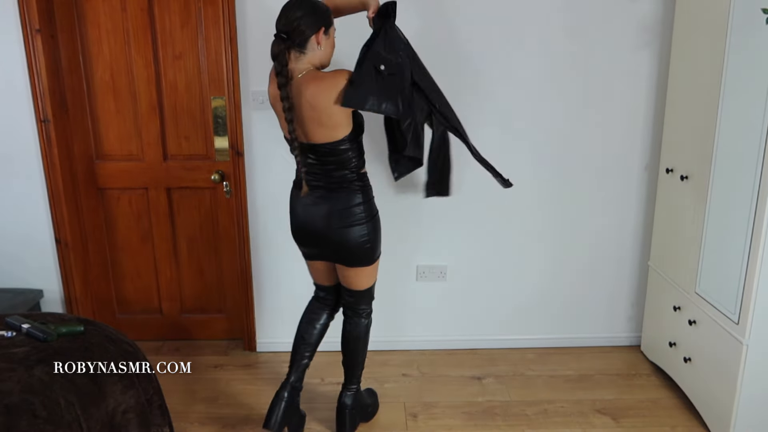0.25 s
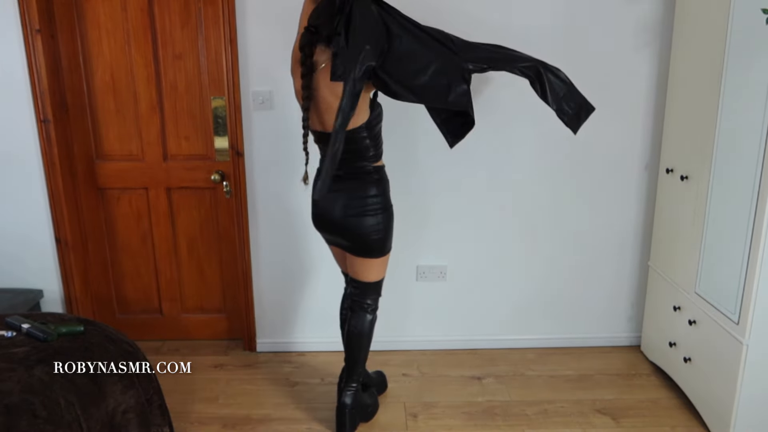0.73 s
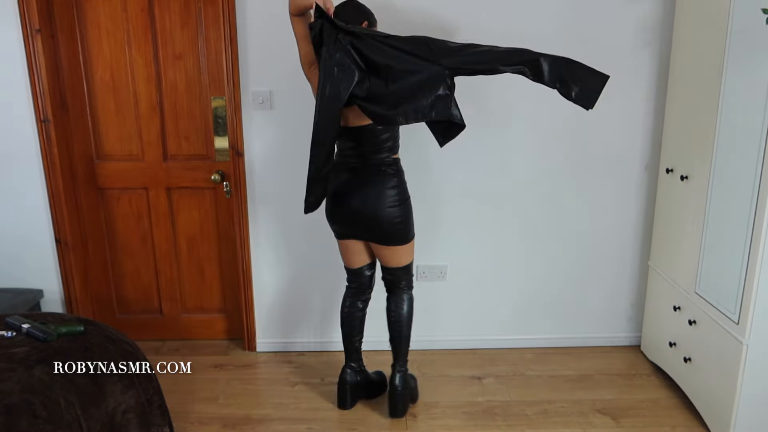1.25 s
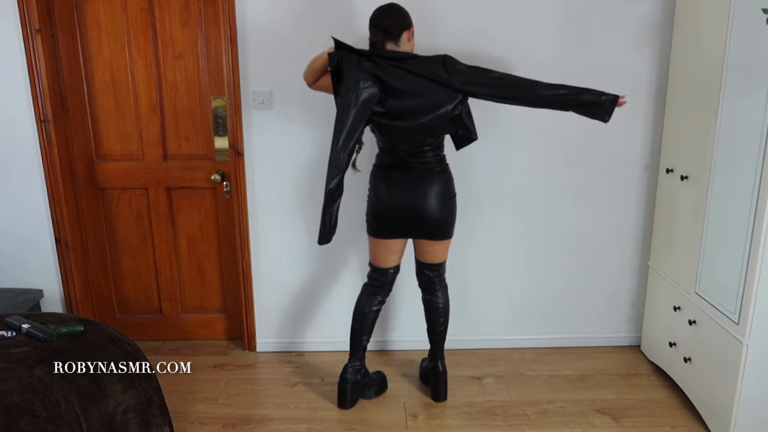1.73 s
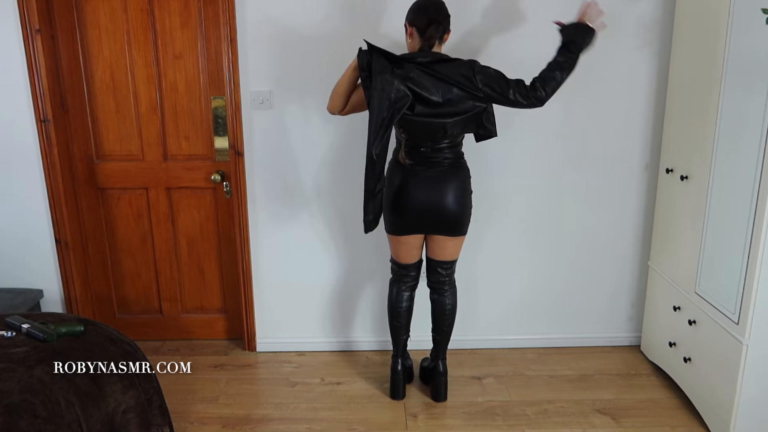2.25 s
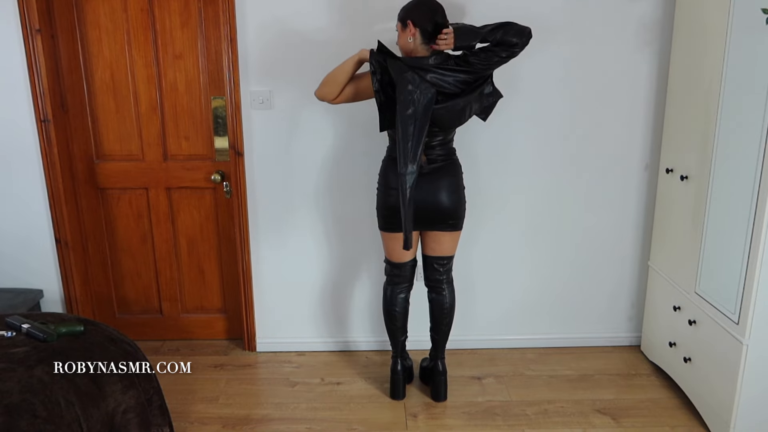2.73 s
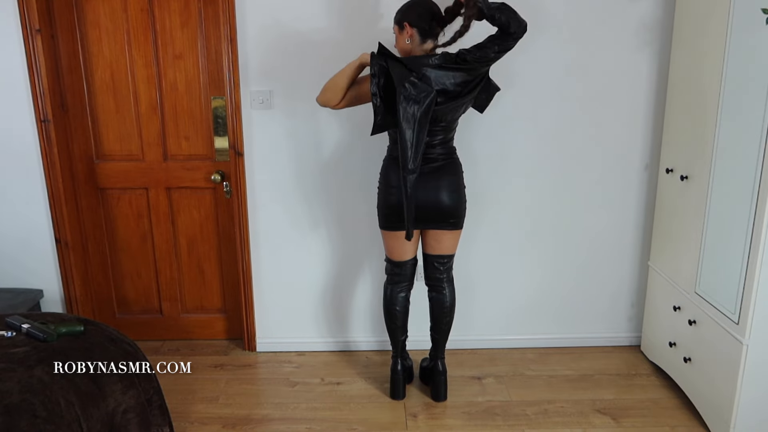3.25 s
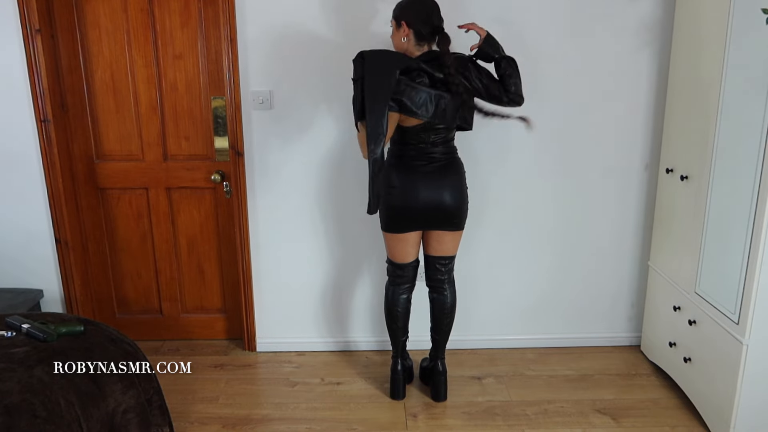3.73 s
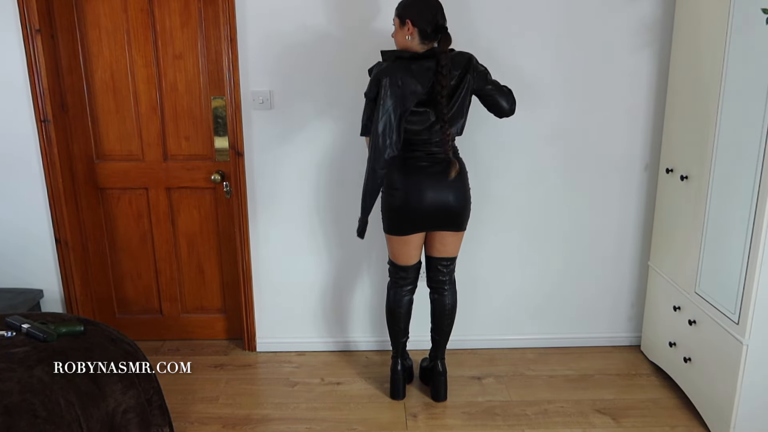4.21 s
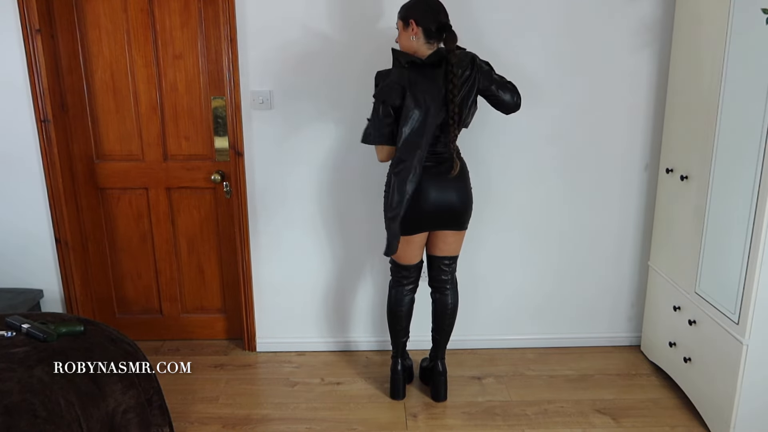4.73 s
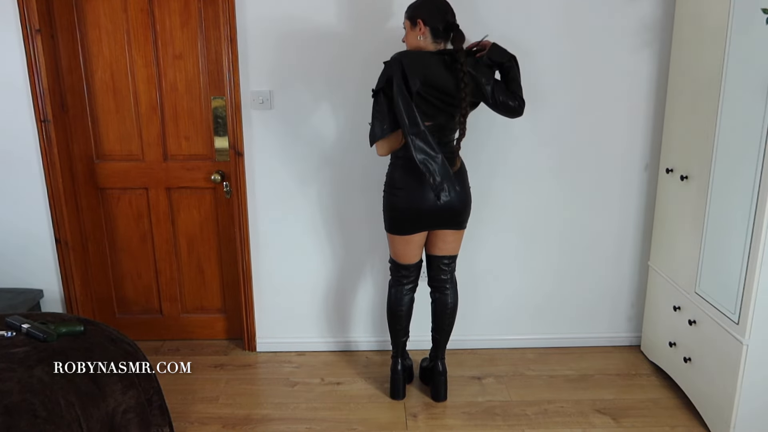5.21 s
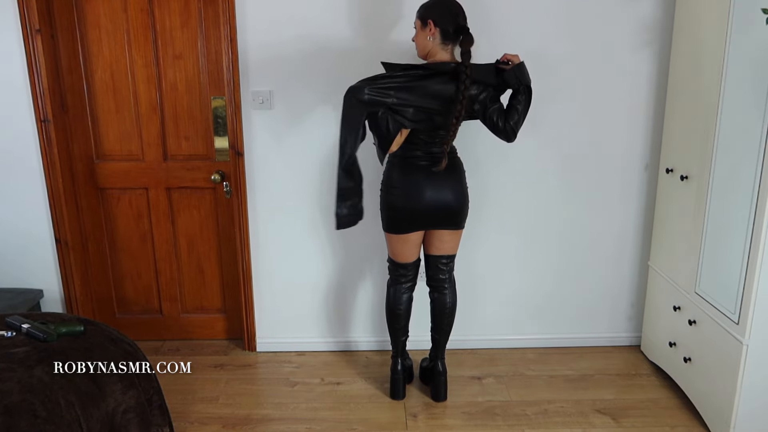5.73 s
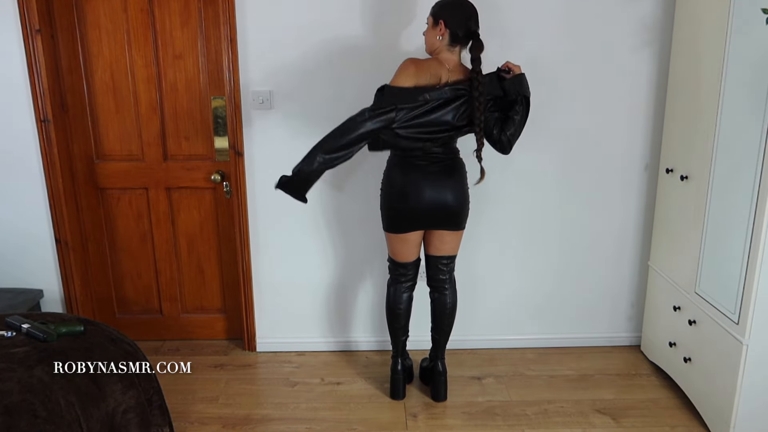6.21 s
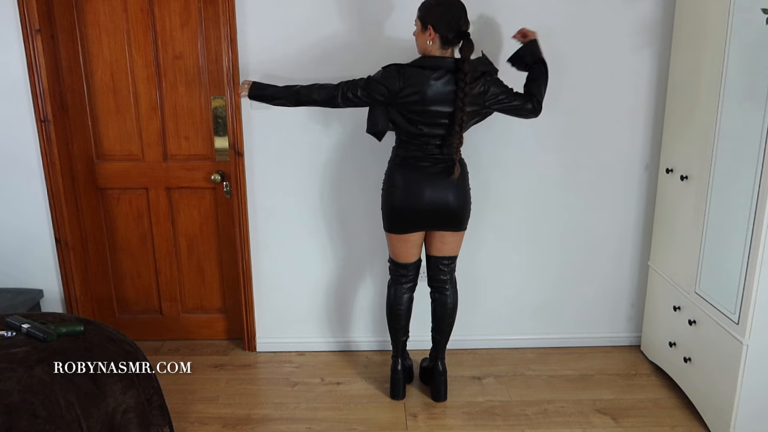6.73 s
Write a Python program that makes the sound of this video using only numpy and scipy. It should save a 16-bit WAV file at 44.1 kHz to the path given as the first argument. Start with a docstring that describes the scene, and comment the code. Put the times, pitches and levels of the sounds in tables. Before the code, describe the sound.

A leather jacket is put on in a small, briefly echoing bedroom, heard from a few metres away over a quiet low rumble. At once a heavy boot knocks on wooden boards with a deep boom, beside a soft leather swish. A second strong step falls at 0.65 s with a small click. From 1.0 to 1.6 s the loose jacket slaps and flutters in a crisp flurry, sharpest around 1.2 s; a softer double step comes at 1.5 s, a click at 1.7 s, and a last heel-and-sole thud near 2.2 s. It is then quieter, with faint rustling and a dull click at 2.6 s. From 3 s rubbing grows; a sharp fold pops at 3.7 s, and creaky crumpling and snaps continue to 5.7 s. Bright lining hisses surge loudest at about 5.8 s and again at 6.1 and 6.5 s, with final fold snaps before 6.8 s as the rustle fades.

```python
"""A leather jacket is swung round and pulled on in a small bedroom, a few metres from one microphone.
Friction is modelled as grains of noise: the lining hisses over arms and shoulders, the hide rubs and crumples.
Impacts and buckling are short noise bursts: loose leather slaps, single folds snap or flop over, hard parts click.
Heavy platform boots take four steps on a wooden floor: damped modes of the boards, and a low boom under each.
Dense decaying echoes form the room, over a quiet low rumble."""
import sys
import numpy as np
from scipy import signal
from scipy.fft import rfft, irfft
from scipy.io import wavfile
from scipy.ndimage import uniform_filter1d

SR = 44100
rng = np.random.default_rng(int(sys.argv[2]) if len(sys.argv) > 2 else 0)


def persist_wave(psi):
    """Save psi, clipped to +-1, as 16-bit WAV."""
    counts = np.round(np.clip(psi, -1, 1) * 32767).astype(np.int16)
    wavfile.write(sys.argv[1], SR, np.atleast_2d(counts).T)


N = 306847
TIME = np.arange(N) / SR  # s

# Levels are relative: later gains balance the sources against one another.
# Spectra of sliding lining, rubbing hide, taut crumpling and deeper crumpling of loose panels: f/Hz, level/dB
LINING_SPECTRUM = [(1200, -7), (2500, -2), (4000, 0.5), (7000, 0), (9500, -3), (12500, -10.5), (16000, -25)]
HIDE_SPECTRUM = [(400, -18.5), (800, -3.5), (1250, 2.5), (2200, 1), (3200, -4), (5000, -17.5),
                 (9000, -17.5)]
TAUT_SPECTRUM = [(100, -31.5), (300, -14.5), (550, -5.5), (820, -1), (1200, -6.5), (2000, -9.5),
                 (4000, -57)]
LOOSE_SPECTRUM = [(70, -28.5), (150, -5), (240, -3), (420, 0), (600, -1.5), (1000, -23), (3000, -44)]
# Swishes over arms and shoulders: t/s of greatest speed, lining level/dB, hide above lining/dB, rise/s, fall/s
SWISHES = [(.02, -31.5, -2, 0.16, 0.24), (.42, -37, 2, 0.18, 0.23), (1.075, -30, 1, 0.15, 0.1),
           (1.53, -38, 4, 0.55, .17), (1.82, -41, 1, 0.1, .09), (2.0, -39.5, 3, .06, 0.069),
           (2.2, -39, 3, 0.097, 0.089), (2.5, -40.5, 4, 0.24, .16), (3.02, -35.5, 3, 0.18, 0.17),
           (3.18, -33.5, 2, 0.12, 0.095), (3.71, -32, 4.5, 0.29, 0.21), (3.87, -37, 10, .1, 0.037),
           (4.32, -35.5, 0, 0.41, 0.2), (4.495, -31, 4, 0.047, 0.05), (4.66, -31.5, 0, 0.087, 0.25),
           (5.12, -30.5, 2, 0.12, 0.26), (5.43, -31, 4, 0.12, 0.074), (5.68, -27.5, 4, 0.19, 0.11),
           (5.838, -22.5, 0.5, 0.13, 0.098), (5.99, -28, -1, 0.066, 0.055), (6.14, -24.5, 1, 0.16, .15),
           (6.48, -27.5, 1.5, 0.19, .38), (6.88, -34.5, 2, 0.28, 0.36)]
# How much the hide is bunched up, most while an arm works into its sleeve: t/s, level/dB
BUNCHING = [(0, -33.5), (.25, -40.5), (.88, -41.5), (1.02, -29), (1.3, -50), (1.83, -34), (1.95, -41.5),
            (3.35, -40), (3.5, -30), (3.8, -29), (4.15, -29.5), (4.45, -32.5), (4.9, -31.5), (5.15, -27),
            (5.5, -32.5), (5.85, -30.5), (6.15, -37), (6.3, -32), (6.96, -41.5)]
# How loose the jacket hangs: t/s, level/dB
SLACK = [(0, -4), (1.1, 1), (3.85, -6.5), (4.2, -3.5), (6.96, -2)]
# Gain of the lining slips' highest treble: t/s, level/dB
TREBLE_GAIN = [(0, -2), (.4, -1), (1.15, -2.5), (1.85, 0), (3.55, 1.5), (3.85, -1.5), (4.75, .5),
               (5.45, 2.5), (6.1, 2), (6.35, -1.5), (6.96, -4)]
# Loose leather slapping against itself: t/s, level/dB, brightness f/Hz, T60/s, dull body level/dB
SLAPS = [(.036, -26, 1500, .26, -10.5), (0.717, -31.5, 5800, 0.18, -1), (0.991, -24, 3180, 0.38, -7.5),
         (1.059, -20.5, 3200, .1, -2.5), (1.082, -21.5, 3500, .08, -4), (1.104, -23.5, 3000, 0.061, 8.5),
         (1.207, -16, 3470, 0.15, .5), (1.233, -21, 3040, 0.16, -3.5), (1.262, -22.5, 3330, 0.29, -4),
         (1.315, -23, 3520, 0.088, -1), (1.4129, -20, 4440, 0.078, 0), (1.494, -25, 3890, 0.08, -3.5),
         (1.583, -26.5, 4530, 0.15, -17), (3.868, -25.5, 3400, 0.062, -2)]
# Spectrum of the dull body of a slap: f/Hz, level/dB
SLAP_BODY_SPECTRUM = [(80, -37), (220, 4), (450, 8.5), (750, 7.5), (1200, -0.5), (2500, -45), (6000, -33)]
# Spectrum of ticking creases: f/Hz, level/dB
CREASE_SPECTRUM = [(200, -16), (600, -4), (1400, -9), (3200, 5.5), (6000, -4.5), (15000, -13)]
# The loudest folds buckling over: t/s, level/dB, centre f/Hz, length/s
FOLDS = [(3.469, -27, 700, 0.029), (3.602, -25, 830, 0.014), (3.7132, -12, 825, 0.01),
         (3.726, -24, 700, 0.015), (3.9835, -19, 756, 0.0077), (4.096, -24.5, 890, 0.021),
         (4.144, -19, 620, 0.032), (4.316, -28, 600, 0.022), (4.474, -25.5, 650, 0.029),
         (4.634, -24, 790, 0.022), (4.905, -16.5, 610, 0.014), (4.943, -32, 554, 0.021),
         (5.116, -17.5, 586, 0.007), (5.147, -17.5, 830, 0.015), (5.166, -19, 930, 0.027),
         (5.378, -17.5, 680, 0.015), (5.659, -23, 680, 0.032), (5.832, -20.5, 580, 0.039),
         (6.647, -19.5, 1370, 0.015), (6.759, -25.5, 1000, .012)]
# Hard clicks, likely the zip pull or studs: t/s, level/dB, brightest f/Hz
CLICKS = [(0.648, -27.5, 2930), (1.695, -24, 2500), (2.608, -20.5, 1490)]
# Modes of the small hard part: f/Hz, level/dB, T60/s
STUD_MODES = [(890, 14, 0.085), (1340, -1, 0.212), (1373, 10.5, 0.15), (2379, 5, 0.2), (2895, 6, 0.15)]
# A heel or sole meeting the boards: t/s, knock level/dB, boom level/dB, boom f/Hz, lingering hum level/dB
FOOTFALLS = [(.038, -20.5, -8.5, 93.6, -48), (0.6451, -19, -8, 112.8, -28), (1.535, -25.5, -11, 102, -47),
             (1.615, -26, -15.5, 94.5, -53), (2.169, -20.5, -16, 99.4, -44), (2.222, -17, -14, 89, -53)]
# Modes of the floor boards: f/Hz, level/dB, T60/s
BOARD_MODES = [(142.7, 14.5, 0.21), (212.6, 0, 0.21), (263.6, 6.5, 0.21), (328.8, 2.5, 0.41),
               (419, -7, 0.63), (466, 0, 0.38), (548, 1, 0.082), (765, -13, 0.1)]
# Spectrum of the sole's contact noise: f/Hz, level/dB
SOLE_SPECTRUM = [(100, -11.5), (300, 9.5), (600, -1.5), (1000, -8.5), (2000, -18), (4000, -24), (9000, -50)]
# Modes of the joists: f/Hz, level/dB, T60/s
JOIST_MODES = [(90, -4, 0.25), (102, -4.5, 0.99), (118.8, -3, 0.93)]
# Lowest modes of the room: f/Hz, level/dB, T60/s
ROOM_MODES = [(86.6, 1, 2.1), (98.3, -7.5, 6)]
# Spectrum of the background air: f/Hz, level/dB
AIR_SPECTRUM = [(20, -16), (35, -5), (60, 2), (92, 0.5), (130, 0), (250, -3), (600, -11), (2000, -14.5),
                (8000, -34), (16000, -30)]
# Low rumble of the room and of air pushed about by the jacket: t/s, level/dB
RUMBLE = [(0, -41), (2.6, -46), (3.6, -44), (4.3, -45), (5.05, -36.5), (5.5, -48), (6.96, -55)]

SWELL_EDGE_DB = -9.5  # gain one rise before or one fall after the peak of any swell
SWISH_SHAPE = 1.47  # 1 = pointed, 2 = round
REST_LINING_DB, REST_HIDE_DB = -46, -47.5  # the jacket never hangs quite still
CRUMPLE_FOLLOWS, USUAL_HIDE_DB = 0.28, -33.5  # dB of crumpling per dB of rubbing above the usual
CREASE_DB, CREASE_T60_S = -12, 0.67  # ticking against the level of the slap that sets it off
BOOM_LAG_S, BOOM_RISE_S, BOOM_FALL_S = 0.0605, 0.031, 0.017  # the weight arrives after the knock
BOOM_SHAPE, BOOM_ONSET_S = 0.72, 0.012  # pointed swell with a soft start
# the boom sinks through its tabled pitch at the lag, by this share of it in all, with this time constant
BOOM_BEND, BOOM_SETTLE_S = 0.42, 0.055
TOP_HZ = 15900


def rustle():
    """Stick-slip friction: fine lining slips, coarser hide and sparse crumpling catch and let go together."""
    slide_db, rub_db, crumple_db = motion()
    catch = walk(rate=70)
    slips = grains(N, rate=10000, spread_db=1.0)
    # the treble above 9 kHz is raised and lowered over time
    treble_filter = signal.butter(2, 9000, "high", fs=SR, output="sos")
    treble = signal.sosfiltfilt(treble_filter, slips)
    slips = slips + treble * (undb(curve(TREBLE_GAIN)) - 1)
    lining = colour(slips, LINING_SPECTRUM) * undb(slide_db + 0.9 * catch + 1.8)

    rubs = grains(N, rate=2200, spread_db=1.0)
    hide = colour(rubs, HIDE_SPECTRUM) * undb(rub_db + 0.76 * catch + 0.5)

    taut = colour(grains(N, rate=900, spread_db=2.5), TAUT_SPECTRUM)
    loose = colour(grains(N, rate=900, spread_db=0.5), LOOSE_SPECTRUM) * undb(curve(SLACK))
    crumpling = (taut + loose) * undb(crumple_db + 1.4 * catch - 3)
    return lining + hide + crumpling


def motion():
    """Superposition of powers: swishes add to a faint stir, and bunched hide crumples more as it rubs (dB)."""
    slide_power, rub_power = undb(REST_LINING_DB) ** 2, undb(REST_HIDE_DB) ** 2
    for s, db, hide_above_db, rise, fall in SWISHES:
        speed = undb(db) * swell(TIME - s, rise, fall, SWISH_SHAPE)
        slide_power = slide_power + speed ** 2
        rub_power = rub_power + (speed * undb(hide_above_db)) ** 2
    slide_db, rub_db = 10 * np.log10(slide_power), 10 * np.log10(rub_power)
    crumple_db = curve(BUNCHING) + CRUMPLE_FOLLOWS * (rub_db - USUAL_HIDE_DB)
    return slide_db, rub_db, crumple_db


def flutter():
    """Elastic recovery: lone creases tick as the hide bends back after each slap."""
    ticks = grains(N, rate=130, spread_db=2)
    bending_power, t = np.zeros(N), np.arange(SR) / SR
    for s, db, *_ in SLAPS:
        add(bending_power, s, (undb(db + CREASE_DB) * fade(t, CREASE_T60_S)) ** 2)
    return colour(ticks, CREASE_SPECTRUM) * np.sqrt(bending_power)


def slaps():
    """Impact of flat sheets: a sharp smack, a patter as the flap settles, and dull air pressed out beneath."""
    out, t = np.zeros(N), np.arange(SR // 3) / SR
    for s, db, hz, t60, body_db in SLAPS:
        contact = 2.06 * fade(t, t60=0.021) * rng.choice([-1, 1], len(t))
        patter = 0.77 * fade(t, t60) * grains(len(t), rate=2700, spread_db=-0.5)
        spectrum = [(hz / 6, -17), (hz * 0.39, -8), (hz * 0.8, 0), (hz * 1.42, -5.5), (hz * 4.3, -21)]
        smack = colour(contact + patter, spectrum)
        puff = fade(t, t60) * grains(len(t), rate=2800, spread_db=-1.5)
        body = colour(puff, SLAP_BODY_SPECTRUM)
        add(out, s, undb(db) * (smack + undb(body_db) * body))
    return out


def folds():
    """Buckling: a fold gives way in stick-slip jerks that drum the hide panel around it; the quick ones pop."""
    out, t = np.zeros(N), np.arange(SR // 4) / SR
    for s, db, hz, length in FOLDS:
        run = np.exp(-(t / length) ** 2)
        jerks = run * grains(len(t), rate=2200, spread_db=1.6)
        jerks[0] += undb(26 - 450 * length)  # the pop: stronger in shorter folds
        panel = [(hz / 8, -25), (hz * 0.47, -6), (hz * 0.6, -0.5), (hz * 1.4, 0),
                 (hz * 2.13, -13), (hz * 6.3, -28), (hz * 12, -39)]
        drummed = unit(colour(jerks, panel)) * np.sqrt(np.mean(run ** 2))
        add(out, s, undb(db + 2.5) * drummed)
    return out


def clicks():
    """Impact of a small hard body: it strikes, chatters briefly and rings in damped modes."""
    out, t = np.zeros(N), np.arange(SR // 3) / SR
    for s, db, hz in CLICKS:
        chatter = fade(t, t60=0.07) * grains(len(t), rate=2500, spread_db=1.2)
        chatter[0] += undb(21)  # the first strike
        spectrum = [(hz / 6, -16), (hz * 0.47, -2), (hz, 0), (3700, -5), (5500, -22), (12000, -36)]
        tick = colour(chatter, spectrum)
        # modes near the pitch of the blow ring most: 8 dB less per octave away
        modes = [(f, gain_db - 8 * abs(np.log2(f / hz)), t60) for f, gain_db, t60 in STUD_MODES]
        add(out, s, undb(db) * (tick + undb(-14.5) * ring(modes, t)))
    return out


def knocks():
    """Modal excitation: the hard sole cracks against the floor and rings the boards."""
    out, t = np.zeros(N), np.arange(SR // 2) / SR
    for s, db, *_ in FOOTFALLS:
        # every spot on the floor favours other modes
        modes = []
        for hz, gain_db, t60 in BOARD_MODES:
            spot_hz = hz * (1 + 0.0163 * rng.standard_normal())
            spot_db = gain_db + 2.1 * rng.standard_normal()
            modes.append((spot_hz, spot_db, t60))
        boards = ring(modes, t)
        contact = 0.85 * rng.standard_normal(len(t)) * fade(t, t60=0.082)
        contact[0] += undb(21)  # the first crack
        add(out, s, undb(db) * (undb(-10.0) * boards + colour(contact, SOLE_SPECTRUM)))
    return out


def thuds():
    """Forced response: the floor booms under the body's weight; joists ring, the lowest room modes beat on."""
    out, hum, t = np.zeros(N), np.zeros(N), np.arange(2 * SR) / SR
    onset = 1 - np.exp(-(t / BOOM_ONSET_S) ** 2)
    load = swell(t - BOOM_LAG_S, BOOM_RISE_S, BOOM_FALL_S, BOOM_SHAPE) * onset
    # pitch sinks as the floor takes the load
    bend = 1 + BOOM_BEND * (np.exp(-t / BOOM_SETTLE_S) - np.exp(-BOOM_LAG_S / BOOM_SETTLE_S))
    for s, _, db, hz, hum_db in FOOTFALLS:
        add(out, s, undb(db) * load * np.sin(2 * np.pi * hz * np.cumsum(bend) / SR))
        add(hum, s + BOOM_LAG_S, undb(hum_db) * ring(ROOM_MODES, t))
    joists = undb(-71) * signal.fftconvolve(out, ring(JOIST_MODES, t))[:N]
    return out + joists + hum


def bedroom(x, t60, treble_t60, count=12, size=256):
    """Diffuse reverberation: near walls give dense echoes, duller as they die, with a pattern for each spot."""
    t, walls = np.arange(SR // 2) / SR, np.zeros(N)
    build_up = np.clip((t - 0.003) / 0.002, 0, 1)
    low_pass = signal.butter(1, 3000, fs=SR, output="sos")
    for spot in range(count):
        echoes = rng.standard_normal(len(t))
        low = signal.sosfilt(low_pass, echoes)
        tail = (low * fade(t, t60) + (echoes - low) * fade(t, treble_t60)) * build_up
        # the sound passes from spot to spot in overlapping windows of 2 * size samples
        turn = (np.arange(N) / size - spot) % count
        share = np.sin(np.pi * np.minimum(turn / 2, 1))
        walls += signal.oaconvolve(x * share, tail / np.linalg.norm(tail))[:N]
    return walls


def rumble():
    """Broadband background noise, strongest in the bass: the quiet room and air pushed about by the jacket."""
    return colour(rng.standard_normal(N), AIR_SPECTRUM, size=8192) * undb(curve(RUMBLE))


def grains(n, rate, spread_db):
    """Random impulse process: tiny slips of uneven size, on average rate per second, scaled to rms 1."""
    slips = rng.random(n) < rate / SR
    sizes = undb(spread_db * np.minimum(rng.exponential(size=n), 4))
    return unit(slips * sizes * rng.choice([-1, 1], n) + 1e-9)


def ring(modes, t):
    """Modal superposition: exponentially damped sines after a blow."""
    return sum(undb(db - 60 * t / t60) * np.sin(2 * np.pi * hz * t) for hz, db, t60 in modes)


def fade(t, t60):
    """Exponential decay by 60 dB in t60 seconds."""
    return np.exp(-np.log(1000) * t / t60)


def swell(t, rise, fall, shape):
    """Transient envelope: gain that grows to 1 at t = 0 and dies away again."""
    distance = np.minimum(np.where(t < 0, -t / rise, t / fall), 20)
    return undb(SWELL_EDGE_DB * distance ** shape)


def walk(rate):
    """Smoothed random steps, rate per second, with a spread near 1."""
    k = int(SR / rate)
    steps = np.repeat(rng.standard_normal(N // k + 1), k)
    return unit(uniform_filter1d(steps, k)[:N])


def colour(x, points, size=2048):
    """Minimum-phase (causal) filtering of unit power through the f/Hz, level/dB points."""
    hz, db = np.transpose(points)
    freqs = np.maximum(np.fft.rfftfreq(size, 1 / SR), 1)
    gains = undb(np.interp(np.log(freqs), np.log(hz), db))
    # folding the cepstrum onto positive time makes the response causal
    cepstrum = irfft(np.log(gains))
    cepstrum[1:size // 2] *= 2
    cepstrum[size // 2 + 1:] = 0
    response = irfft(np.exp(rfft(cepstrum)))
    return signal.fftconvolve(x, response / np.linalg.norm(response))[:len(x)]


def curve(points):
    """Linear interpolation of t/s, level/dB points over the whole scene."""
    return np.interp(TIME, *np.transpose(points))


def undb(db):
    """Amplitude gain from decibels."""
    return 10 ** (np.asarray(db) / 20)


def unit(x):
    """Normalisation to rms 1."""
    return x / np.sqrt(np.mean(x ** 2))


def add(track, s, sound):
    """Linear superposition: mix a sound in at time s."""
    i = max(int(s * SR), 0)
    track[i:i + len(sound)] += sound[:N - i]


def scene():
    """Sum of direct and reverberant sound: jacket and boots over the rumble, the same in both channels."""
    diffuse = rustle() + flutter() + slaps() + clicks()
    blows = folds() + knocks()
    walls = bedroom(undb(-4.0) * diffuse + undb(-5.5) * blows, t60=0.26, treble_t60=0.17)
    direct = undb(-2) * diffuse + undb(-2.14) * blows
    return np.tile(direct + walls + thuds() + rumble(), (2, 1))


def record(dry):
    """Band limiting: the recorder cuts the top with a steep elliptic low-pass."""
    return signal.sosfilt(signal.ellip(10, 0.2, 80, TOP_HZ, fs=SR, output="sos"), dry)


dry = scene()
out = record(dry)
persist_wave(out)
```